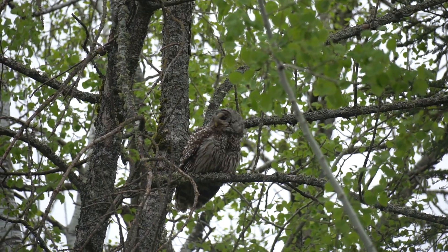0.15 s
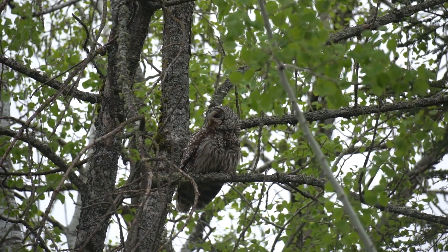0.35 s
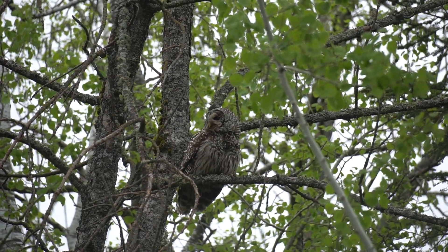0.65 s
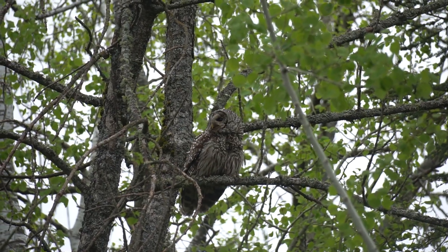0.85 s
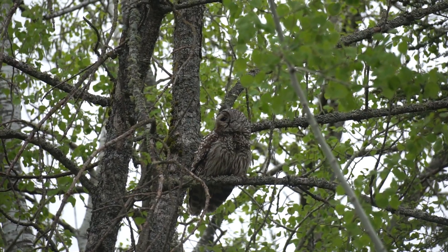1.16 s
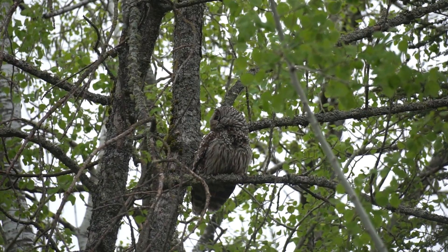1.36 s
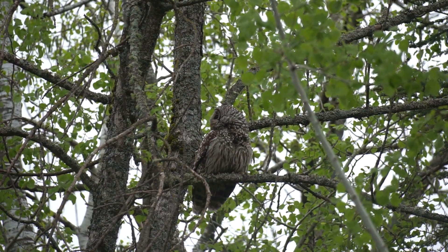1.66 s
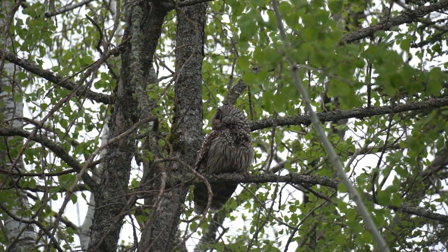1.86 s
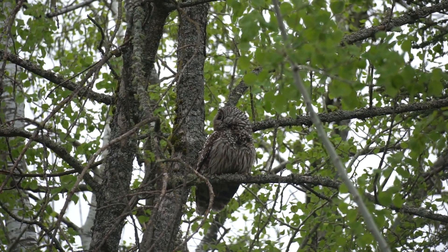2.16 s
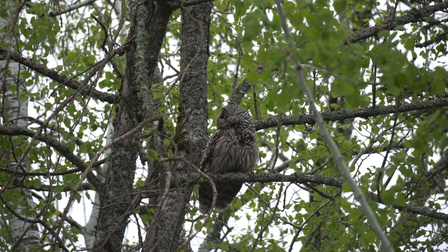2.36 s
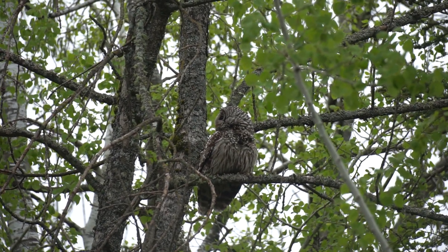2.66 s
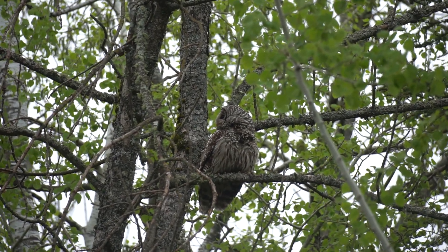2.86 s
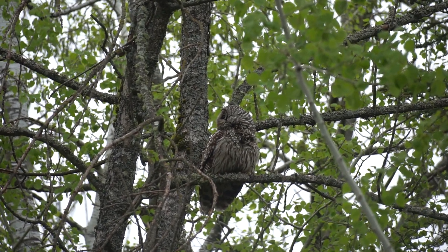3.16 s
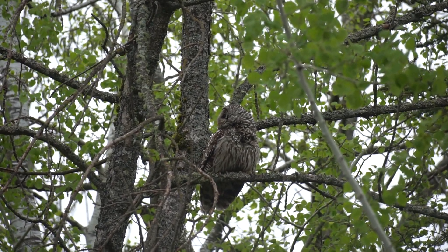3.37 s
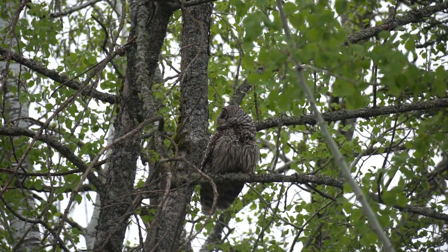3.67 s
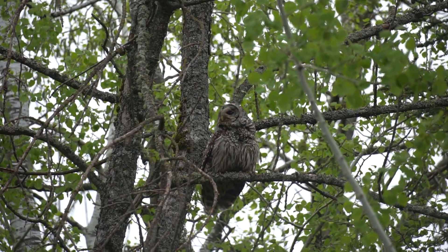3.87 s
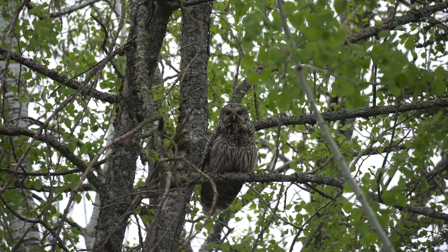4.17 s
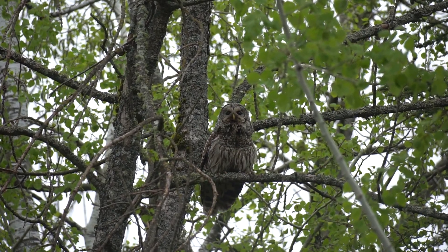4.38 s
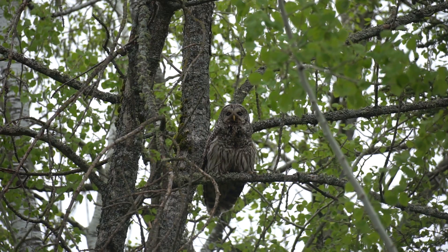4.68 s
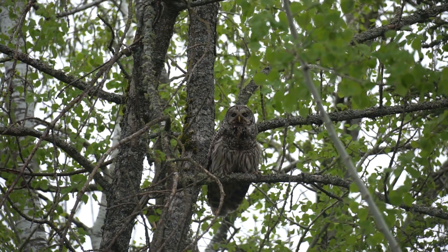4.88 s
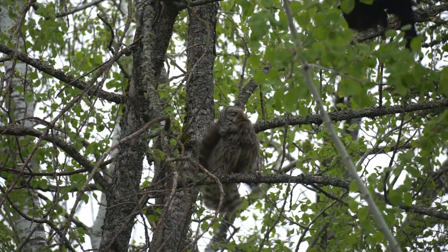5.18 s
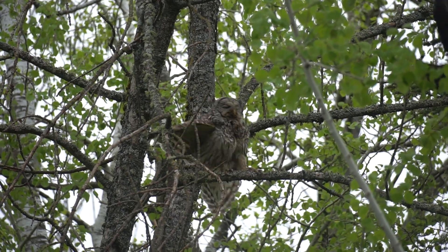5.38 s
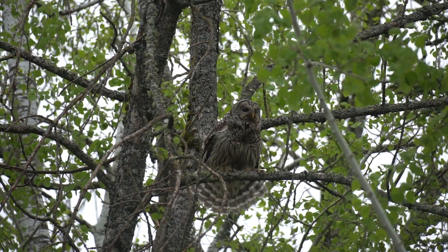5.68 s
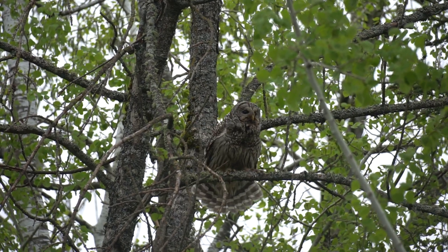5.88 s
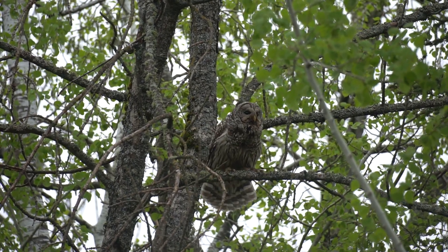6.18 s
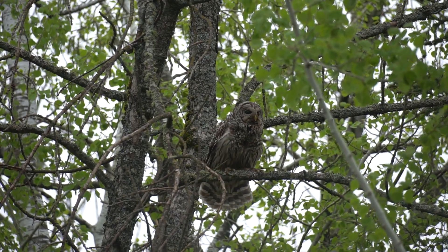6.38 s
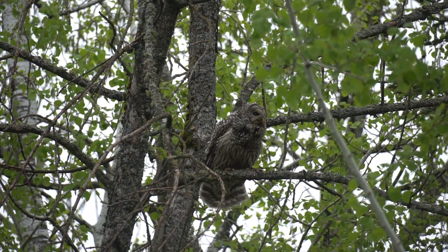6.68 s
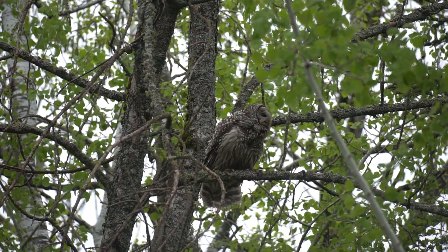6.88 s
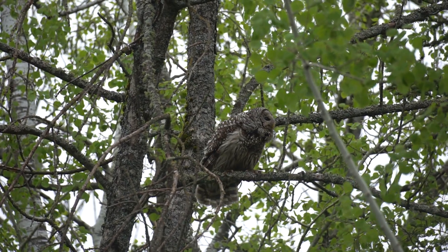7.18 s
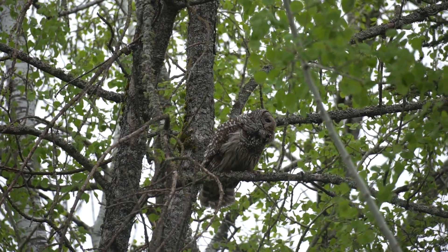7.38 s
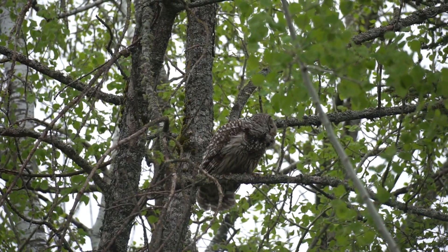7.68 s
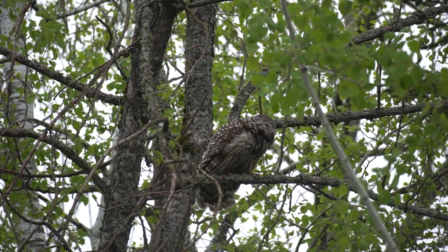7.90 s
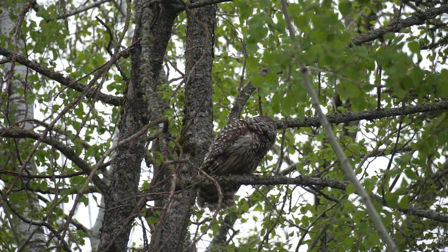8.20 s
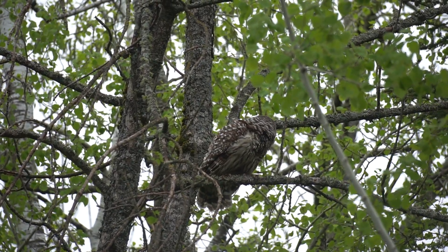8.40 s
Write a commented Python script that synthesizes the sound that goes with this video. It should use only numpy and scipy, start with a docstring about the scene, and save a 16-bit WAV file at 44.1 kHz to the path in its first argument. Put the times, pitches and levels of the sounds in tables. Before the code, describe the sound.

Still woodland air makes a soft, steady rush with a barely audible distant drone. From 0 to 4 s, dry twig ticks, clustered around 0.7-1.2 s, mix with light songbird whistles, quick zigzag warbles and far twitter, busiest at about 1.7-3.9 s and echoing among trunks. At 4.3 s an owl grunts slightly and gives a soft opening hoot. Short, hollow, mid-low hoots follow at about 4.8, 5.0, 5.5, 5.8, 6.2, 6.6 and 7.1 s, each scooping up roughly and dropping away. Feathers and leaves rustle faintly around 5.1-5.9 s. At 7.3 s the owl holds a longer clear note, which breaks at 7.6 s into a gruff, quavering descent ending near 8 s. A hoarse, fluttering crow on the right caws at 7.4, 7.7, 8.1 and 8.4 s. Light woodland echo remains.

```python
"""A wood in still air: a barred owl hoots eight times, then holds a long note that drops gruff and falling.
Owl: harmonic stacks through a throat resonance favouring the hoots' fundamental and low slides' 2nd harmonic.
Crow to the right: four fluttering caws with breath noise. Songbirds further off: swept sines.
Twigs tick and brushes rustle as shaped noise; far tones and a drone are sines; trunks and leaves scatter
all but the air and the rustle as decaying noise echoes."""
import sys
import numpy as np
from scipy import signal
from scipy.fft import rfft, irfft, next_fast_len
from scipy.io import wavfile
from scipy.ndimage import map_coordinates

SR = 44100
rng = np.random.default_rng(int(sys.argv[2]) if len(sys.argv) > 2 else 0)


def to_wav(s):
    """Save 16-bit WAV."""
    ch = np.atleast_2d(s).T  # columns
    pcm = np.round(np.clip(ch, -1, 1) * 32767)  # PCM
    wavfile.write(sys.argv[1], SR, pcm.astype(np.int16))


N = 376613
T = np.arange(N) / SR
TOP_HZ = 11050

# Still air, spectral outline: freq_hz, relative_density_db
AIR_OUTLINE = [(15, -74), (25, -35), (101, -12.5), (169, -9), (381, -6.5), (444, -7), (685, -1),
               (819, -3.5), (1030, -7), (1330, -9.5), (2510, -9.5), (3500, -6.5), (3770, -10), (9930, -16),
               (11000, -18.5), (14300, -71), (22000, -120)]
AIR_DB = -55.5
# Faint far-off drone, before wavering and fade: pitch_hz, level_db
DRONE_TONES = [(97, -76), (120, -74)]

# Faint low tones from far off: start_s, end_s, pitch_hz, level_db
LOW_TONES = [(1.418, 1.51, 400, -58), (1.497, 1.6, 570, -62), (2.36, 2.503, 564, -60.5),
             (3.498, 3.62, 129, -66)]

# Brushes of feathers and leaves as the birds move: loudest_s, level_db, time_per_10_db_s
BRUSH_SWELLS = [(5.08, -59, .08), (5.36, -56.5, 0.4), (5.55, -51.5, .11), (5.82, -52.5, 0.15),
                (6.8, -62.5, 1.5)]

# Twig ticks: start_s, level_db, centre_hz
TWIG_TICKS = [(0.711, -45, 6000), (.782, -44.5, 7000), (0.879, -47, 750), (1.017, -48, 1100),
              (1.126, -43, 1850), (1.187, -39.5, 4500), (2.295, -45.5, 920), (2.329, -43, 1400),
              (3.166, -39.5, 3480), (4.684, -42, 4220), (8.115, -41.5, 7800)]
TICK_CYCLES = 9.7  # to decay by a factor e; low ticks ring longer

# Distant twitter, before mixing: start_s, end_s, first_hz, last_hz, first_db, last_db
TWITTER_SONGS = [(.55, 1.5, 3650, 3487, -58.5, -57.5), (1.68, 3.3, 3800, 3952, -51.5, -48.5),
                 (3.301, 3.799, 4210, 4182, -46, -44), (6.795, 7.302, 4560, 4320, -65.5, -54.5)]
# Higher, thinner trill bursts, before mixing: start_s, level_db
TRILL_BURSTS = [(2.66, -62), (3.04, -59), (3.5, -53.5)]
TRILL_S, TRILL_HZ = 0.1, 6180
SWEEPS_PER_S = 80
SYLLABLES_PER_S, SYLLABLE_DB = 10.98, 2.5
# Near zigzag phrases from the top, before mixing: start_s, length_s, centre_hz, swings, level_db
WARBLE_PHRASES = [(.045, .103, 3000, 1.5, -44), (1.68, .11, 3073, 1.35, -48.5),
                  (3.154, 0.053, 2953, 0.72, -46), (3.352, .075, 2836, .8, -47.5),
                  (4.732, 0.2, 3396, 1.5, -53)]
WARBLE_OCTAVES = .25
DOWNSWING_DB = 2  # falling half of each swing is louder
# Single whistles, before mixing: start_s, length_s, middle_hz, glide_octaves, level_db
SINGLE_WHISTLES = [(0.386, 0.0085, 6940, 0.33, -53.5), (.45, .022, 3480, -.05, -52.5),
                   (.897, 0.05, 3640, -.25, -53.5), (1.809, .032, 3200, .1, -47),
                   (1.786, 0.057, 3140, 0.11, -45), (2.748, 0.077, 4100, -0.14, -52.5),
                   (3.222, .027, 4060, -0.32, -44), (3.228, 0.043, 5230, 0.042, -45.5),
                   (3.266, 0.075, 2436, -0.043, -51), (3.389, 0.13, 4900, .22, -45.5),
                   (3.54, 0.021, 3900, -0.424, -43.5), (3.696, .03, 4190, -0.3, -43),
                   (3.71, .04, 5200, 0.013, -48), (3.875, 0.11, 4670, 0.026, -49.5),
                   (3.884, .1, 4080, -.02, -51.5), (6.872, .04, 4690, -.05, -57.5),
                   (7.079, .037, 4550, -.14, -52.5), (7.18, .04, 4350, .2, -55)]

# Caws: start_s, top_pitch_hz, level_db
CAW_CALLS = [(7.391, 779, -24), (7.728, 777.8, -23.5), (8.06, 770, -25), (8.399, 761.5, -26.5)]
# Course of one caw: share_of_length, pitch_ratio, level_db
CAW_COURSE = [(0, .73, -15.5), (0.131, .84, -9.5), (0.249, 0.96, -1), (0.402, 1, 2), (0.53, 0.98, -0.5),
              (.7, .91, -2.5), (0.867, .84, -8), (1, .76, -4.5)]
# Crow's throat, beak open: freq_hz, gain_db
CROW_THROAT_GAIN = [(600, -15.5), (800, -25), (1150, -7.5), (1400, 1), (1560, -3.5), (1850, -13.5),
                    (2300, -20.5), (3000, -24), (3800, -22.5), (4600, -31), (5500, -26), (6300, -39),
                    (7200, -51), (9500, -58)]
# Hiss through the open beak, outline: freq_hz, relative_level_db
BREATH_OUTLINE = [(1100, -17), (1900, 7.5), (2700, -20), (3700, 4), (4400, -4.5), (5400, -1), (6300, -3.5),
                  (7200, -13), (8800, -17.5), (10500, -30.5)]
CAW_S = .151
CAW_FLUTTER_HZ, CAW_SHIMMER_DB = 68, 1.8  # nominal flutter rate, spread of strength jumps

# Owl's throat, beak shut: freq_hz, gain_db
OWL_THROAT_GAIN = [(280, -15), (430, -11), (530, -2.5), (610, -3), (650, -0.5), (700, -14), (860, -8),
                   (1000, -18), (1250, -19.5), (1420, -34.5), (1700, -26.5), (1980, -24.5), (2600, -26),
                   (3200, -39.5), (3800, -35.5), (4600, -70)]
# Short arched hoots: start_s, end_s, top_hz, drive_db, overtones_db, scoop_before_s, drop_after_s
SHORT_HOOTS = [(4.829, 4.888, 622.6, -20, -3.5, 0.038, 0.039),
               (4.984, 5.104, 661.4, -20.5, -0.5, 0.052, .016),
               (5.496, 5.613, 682.6, -20.5, 0, 0.032, 0.029), (5.798, 5.906, 673.6, -18.5, 1, 0.027, .032),
               (6.184, 6.291, 658.8, -18, 1.5, .036, .032), (6.643, 6.738, 644, -17.5, 1, .044, .044),
               (7.087, 7.184, 643, -18, 1, .047, 0.054)]
# Soft opening hoot: time_s, pitch_hz, level_db
OPENING_COURSE = [(4.374, 533, -39), (4.392, 635, -36.5), (4.456, 603.5, -45), (4.472, 653, -40),
                  (4.514, 684, -32), (4.56, 688.4, -28.5), (4.626, 643, -32), (4.638, 600, -37)]
# Long closing hoot: time_s, pitch_hz, level_db
CLOSING_COURSE = [(7.3, 543, -27.5), (7.328, 622.4, -20), (7.39, 643.4, -20), (7.496, 650, -20),
                  (7.564, 601, -19.5), (7.588, 554, -24.5), (7.63, 534, -24)]
# Pitch ratios at the ends of a short hoot; higher flatness = flatter top, quicker ends
HOOT_FIRST, HOOT_LAST, HOOT_FLATNESS = .82, .81, 3.1
# Low-register slides at usual drive: first_hz, middle_hz, last_hz
SCOOP_HZ = (314.7, 429.2, 488)  # out of silence
SLUR_HZ = (284, 345.3, 438.4)  # lazier, out of the sound before
DROP_HZ = (419.5, 312.8, 267.6)
SLUR_GAP_S = .15  # a hoot this soon after the last is slurred
# Slide level at the reference pitch; more pressure raises pitch and level together
SLIDE_DB, SLIDE_REF_HZ, PUSH_DB_PER_OCTAVE = -26.5, 400, 12.5
SLIDE_EDGE_DB = -2  # fullest in the middle
SLIDE_FULL_S = .028  # shorter slides are weaker
# Harder drive makes slides higher, louder and brighter, with more second harmonic
USUAL_DRIVE_DB, SLIDE_OCTAVES_PER_DB, SLIDE_BRIGHT_PER_DB = -19, 0.0343, 1.2
SLIDE_LEVEL_PER_DB, SLIDE_SECOND_PER_DB = 0.55, .7
# Grunt, then the slurs into the opening and closing hoots; *_DB here is drive
GRUNT_START_S, GRUNT_END_S, GRUNT_DB = 4.295, 4.31, -23
OPENING_SLUR_S, OPENING_SLUR_DB = .06, -24
CLOSING_SLUR_S, CLOSING_SLUR_DB = 0.087, -20
# Pitch slip at the end of a long hoot
SLIP_SHARE, SLIP_S = 0.11, 0.009
# Gruff fall: base pitch and level, sag, fade, quaver
FALL_S, FALL_HZ, FALL_DB = .38, 423.4, -23
SAG_HZ_PER_S, FADE_DB_PER_S = 265, 21
QUAVER_HZ, QUAVER_DEPTH = 16, 0.024
BREAK_HZ, BREAK_S = 66, 0.0083  # starts this much higher, settles this fast
GIVE_OUT_S, GIVE_OUT_HZ, GIVE_OUT_DB = 0.05773, 53, -13  # extra drop over the last moments


def undb(db):
    """Decibels to gain."""
    return 10 ** (np.asarray(db) / 20)


def unit(x):
    """Scale to rms 1."""
    return x / np.sqrt(np.mean(x ** 2))


def response(points, hz):
    """Gain of a (freq_hz, gain_db) outline, falling steeply outside its ends."""
    f, db = np.transpose(points)
    hz = np.maximum(hz, 1)
    skirts = np.minimum(1, np.minimum(hz / f[0], f[-1] / hz)) ** 2
    return undb(np.interp(np.log(hz), np.log(f), db)) * skirts


def colour(x, points):
    """Filter by a (freq_hz, gain_db) outline."""
    n = next_fast_len(x.shape[-1])
    hz = np.arange(n // 2 + 1) * SR / n
    return irfft(rfft(x, n) * response(points, hz), n)[..., :x.shape[-1]]


def wander(t, rate_hz):
    """Smooth chance, spread near 1, through rate_hz random values a second."""
    place = (t - t[0]) * rate_hz
    return map_coordinates(rng.standard_normal(4096), [place], order=2, mode="wrap")


def tone(hz):
    """Sine following a pitch curve."""
    return np.sin(2 * np.pi * np.cumsum(hz) / SR)


def span(start, end, fade_s=.008):
    """Sample times of a note and its soft-edged gate."""
    t = T[max(int((start - fade_s / 2) * SR), 0):int((end + fade_s / 2) * SR)]
    edge = np.clip(np.minimum(t - start, end - t) / fade_s + .5, 0, 1)
    return t, np.sin(np.pi / 2 * edge) ** 2


def arch(t, start, end, first, middle, last, power):
    """Glide through three values; higher power flattens the middle."""
    u = np.clip(2 * (t - start) / (end - start) - 1, -1, 1)
    return middle + (np.where(u < 0, first, last) - middle) * np.abs(u) ** power


def add(out, t, sound):
    """Mix a note in at its time."""
    i = int(round(t[0] * SR))
    out[i:i + len(t)] += sound


def pan(x, left_db):
    """Place a source by its left-minus-right level."""
    return x * undb(np.array([[left_db], [-left_db]]) / 2)


def wood(x, wet_db, t60_s, treble_db, alike_db, build_s, trunk_share):
    """Scatter: diffuse from leaves, separate echoes from trunks; ears differ more in the treble."""
    t = T[:2 * SR]
    leaves = rng.standard_normal((2, len(t)))
    hits = rng.random(len(t)) < 60 / SR  # about 60 a second
    trunks = unit(rng.standard_normal((2, len(t))) * hits)
    decay = undb(-60 * t / t60_s) * (1 - np.exp(-t / build_s))
    mid, side = (leaves + trunk_share * trunks) * decay
    side = colour(side, [(1, -25.5), (500, -alike_db), (2500, -4.0), (20000, 10)])
    ears = np.array([mid + side, mid - side]) / np.sqrt(np.sum(mid ** 2))
    echo = colour(ears, [(1, 23), (1000, -2.5), (5000, treble_db), (11000, 7.0)])
    return undb(wet_db) * signal.fftconvolve(x[None], echo, axes=1)[:, :N]


def air():
    """Steady noise rush, humped near 750 Hz, alike in both ears only in the bass; a drone that fades back."""
    mid, side = (unit(colour(rng.standard_normal(N), AIR_OUTLINE)) for _ in range(2))
    side = colour(side, [(20, -22.5), (120, -15), (250, -5.5), (600, -3.5), (1200, 2), (11000, -2.5)])
    hump_outline = [(450, -14.5), (600, -11), (780, -3.5), (900, -8.5), (1100, -19)]
    hump = unit(colour(rng.standard_normal((3, N)), hump_outline))
    rush = undb(-63.5 + 0.98 * wander(T, 2.5)) * (hump[0] + .8 * hump[1:])  # shared + one per ear
    drone = np.zeros(N)
    for hz, db in DRONE_TONES:
        drone += undb(db + 2 * wander(T, 21)) * tone(hz + 3 * wander(T, 36))
    drone *= undb(np.interp(T, [2.0, 2.3], [3, -4]))
    return undb(AIR_DB) * np.array([mid + side, mid - side]) + rush + drone


def far_tones():
    """Brief low sines from deep in the wood, with strong echo."""
    out = np.zeros(N)
    for start, end, hz, db in LOW_TONES:
        t, gate = span(start, end, fade_s=0.044)
        add(out, t, gate * undb(db) * np.sin(2 * np.pi * hz * t))
    return out + wood(out, wet_db=-8, t60_s=0.61, treble_db=0, alike_db=7.4, build_s=.01, trunk_share=0.57)


def rustle():
    """Broad treble noise in uneven brushes that swell and fade."""
    outline = [(900, -2), (2500, -3.5), (5000, -5.5), (8500, -8.5), (11000, -11.5)]
    brush = colour(rng.standard_normal((2, N)), outline)
    swells_db = [db - 10 * np.abs(T - s) / fade_s for s, db, fade_s in BRUSH_SWELLS]
    return unit(brush) * undb(np.max(swells_db, axis=0) + 4.4 * wander(T, 61))


def twigs():
    """Dry ticks: decaying noise bursts in one broad resonance."""
    out = np.zeros(N)
    for start, db, hz in TWIG_TICKS:
        t = T[int(start * SR):][:SR // 16]
        burst = unit(colour(rng.standard_normal(len(t)), [(hz / 3, -8), (hz, 0), (hz * 2, -7)]))
        add(out, t, undb(db) * burst * np.exp(-(t - t[0]) * hz / TICK_CYCLES))
    out = colour(out, [(400, 0), (20000, 0)])  # ticks carry no bass
    return out + wood(out, wet_db=-5.5, t60_s=0.29, treble_db=-9, alike_db=3.3, build_s=0.0076,
                      trunk_share=0.48)


def whistle(t, hz):
    """Songbird's nearly pure, slightly unsteady tone."""
    return tone(hz * (1 + .012 * wander(t, 400)))


def chatter(start, end, first_hz, last_hz, first_db, last_db, spread):
    """Brief up and down sweeps scattered round a centre pitch, their levels grouped into syllables."""
    out = np.zeros(N)
    count = int((end - start) * SWEEPS_PER_S) + 2
    starts = np.linspace(start, end, count)
    centres_hz = np.linspace(first_hz, last_hz, count)
    levels_db = np.linspace(first_db, last_db, count) + SYLLABLE_DB * wander(starts, SYLLABLES_PER_S)
    chances = rng.uniform(-1, 1, (count, 2))
    for at, centre_hz, db, (high, direction) in zip(starts, centres_hz, levels_db, chances):
        t, gate = span(at, at + .03, fade_s=.015)
        sweep = .7 * np.sign(direction) * np.linspace(-1, 1, len(t))
        hz = centre_hz * np.exp(spread * (high + sweep))
        add(out, t, gate * undb(db) * tone(hz))
    return out


def songbirds():
    """Near warbles and whistles plus further twitter and trills, heard mostly through the trees."""
    near, far = np.zeros(N), np.zeros(N)
    for start, length, centre_hz, swings, db in WARBLE_PHRASES:
        t, gate = span(start, start + length)
        swing = 2 * np.pi * swings * (t - start) / length
        hz = centre_hz * 2 ** (WARBLE_OCTAVES * np.cos(swing))
        add(near, t, gate * undb(db + DOWNSWING_DB * np.sin(swing)) * whistle(t, hz))
    for start, length, middle_hz, glide_octaves, db in SINGLE_WHISTLES:
        t, gate = span(start, start + length)
        hz = middle_hz * 2 ** (glide_octaves * ((t - start) / length - .5))
        add(near, t, gate * undb(db) * whistle(t, hz))
    for song in TWITTER_SONGS:
        far += chatter(*song, spread=0.23)
    for start, db in TRILL_BURSTS:
        far += chatter(start, start + TRILL_S, TRILL_HZ, TRILL_HZ, db, db, spread=.1)
    direct = pan(.8 * near + .3 * far, 3.5)
    return direct + wood(1.43 * near + far, wet_db=-4, t60_s=1.0, treble_db=-0.5, alike_db=3,
                         build_s=0.0026, trunk_share=0.73)


def syrinx(t, hz, throat, jitter, rasp_db, bright_db=0, even_db=0):
    """Wavering harmonic stack plus air noise gated once a cycle, both shaped by the throat."""
    hz = hz * (1 + jitter * wander(t, 297.7))
    phase = 2 * np.pi * np.cumsum(hz) / SR
    k = np.arange(1, 15)[:, None]
    # effort brightens the overtones; a symmetric swing of the membranes weakens the even ones
    effort_db = bright_db * np.clip(k * hz / 1000 - 1, 0, 1)
    symmetry_db = even_db * (k % 2 == 0) * 2 / k
    gains = response(throat, k * hz) * undb(effort_db + symmetry_db)
    stack = np.sqrt(2) * np.sum(gains * np.sin(k * phase), axis=0)
    gated_air = unit(colour(rng.standard_normal(len(t)) * (1 + np.cos(phase)), throat))
    return stack + undb(rasp_db) * gated_air


def crow():
    """Caws arch in pitch, flutter in pitch and strength, and grow hoarse as they fall."""
    out = np.zeros(N)
    share, ratio, shape_db = np.transpose(CAW_COURSE)
    for start, top_hz, db in CAW_CALLS:
        t, gate = span(start, start + CAW_S)
        u = (t - start) / CAW_S
        flutter = np.sin(2 * np.pi * CAW_FLUTTER_HZ * (t - start) + 0.79 * wander(t, 40.0))
        hz = top_hz * np.interp(u, share, ratio) * (1 + .014 * flutter + .009 * wander(t, 900))
        # the beak is wide at the start, so the overtones lead
        bright_db = np.interp(u, [0, .3, 1], [7, .5, -2])
        voice = syrinx(t, hz, CROW_THROAT_GAIN, jitter=.011 + .026 * u ** 2, rasp_db=-30.0 + 13.4 * u,
                       bright_db=bright_db)
        voice *= undb(np.interp(u, share, shape_db))
        breath_db = np.interp(u, [0, .4, .8, 1], [-37, -23.5, -22.5, -17.0])
        hiss = rng.standard_normal(len(t)) * (1 + 0.2 * flutter)
        breath = unit(colour(hiss, BREATH_OUTLINE)) * undb(breath_db)
        rough_db = 1.6 * flutter + CAW_SHIMMER_DB * wander(t, 220)
        add(out, t, gate * undb(db + rough_db) * (voice + breath))
    direct = pan(out, -13)
    direct[0] = np.roll(direct[0], 2)  # left ear two samples later
    return direct + wood(out, wet_db=-0.5, t60_s=0.96, treble_db=0.5, alike_db=3, build_s=0.017,
                         trunk_share=0.63)


def slide(start, end, course_hz, drive_db):
    """Rough glide in the owl's low register, louder as it rises."""
    t, gate = span(start, end)
    effort_db = drive_db - USUAL_DRIVE_DB
    hz = arch(t, start, end, *course_hz, 1.16) * 2 ** (SLIDE_OCTAVES_PER_DB * effort_db)
    swell_db = arch(t, start, end, SLIDE_EDGE_DB, 0, SLIDE_EDGE_DB, 1.3)
    push_db = PUSH_DB_PER_OCTAVE * np.log2(hz / SLIDE_REF_HZ)
    db = SLIDE_DB + SLIDE_LEVEL_PER_DB * effort_db + push_db + swell_db
    voice = syrinx(t, hz, OWL_THROAT_GAIN, jitter=.012, rasp_db=-18,
                   bright_db=-5.0 + SLIDE_BRIGHT_PER_DB * effort_db,
                   even_db=0.7 + SLIDE_SECOND_PER_DB * effort_db)
    fullness = min((end - start) / SLIDE_FULL_S, 1) ** 2
    return t, gate * undb(db) * fullness * voice


def hoot(start, end, top_hz, drive_db, overtones_db):
    """Clean arch in the upper register, brightest near its top."""
    t, gate = span(start, end, fade_s=.022)
    hz = arch(t, start, end, HOOT_FIRST * top_hz, top_hz, HOOT_LAST * top_hz, HOOT_FLATNESS)
    bright_db = overtones_db + arch(t, start, end, -9, -1, -15, 2.7)
    voice = syrinx(t, hz, OWL_THROAT_GAIN, jitter=.002, rasp_db=-36, bright_db=bright_db, even_db=-12)
    return t, gate * undb(drive_db) * voice


def long_hoot(course, bright_db):
    """Clean note on a pitch and level curve, throat gain at that pitch divided out; slips down at its end."""
    s, pitch_hz, db = np.transpose(course)
    t, gate = span(s[0], s[-1])
    hz = np.interp(t, s, pitch_hz)
    slip = 1 - SLIP_SHARE * np.exp(np.minimum(t - s[-1], 0) / SLIP_S)
    voice = syrinx(t, hz * slip, OWL_THROAT_GAIN, jitter=.002, rasp_db=-38, bright_db=bright_db, even_db=-12)
    return t, gate * undb(np.interp(t, s, db)) * voice / response(OWL_THROAT_GAIN, hz)


def fall(start):
    """Voice breaks into the low register and sinks with a quaver until it gives out."""
    t, gate = span(start, start + FALL_S)
    age = np.maximum(t - start, 0)
    spent = np.clip(1 - (FALL_S - age) / GIVE_OUT_S, 0, 1)
    breaking = np.exp(-age / BREAK_S)
    hz = FALL_HZ + BREAK_HZ * breaking - SAG_HZ_PER_S * age - GIVE_OUT_HZ * spent
    hz = hz * (1 - QUAVER_DEPTH * np.sin(2 * np.pi * QUAVER_HZ * age))
    db = FALL_DB - FADE_DB_PER_S * age + GIVE_OUT_DB * spent - 7 * breaking
    voice = syrinx(t, hz, OWL_THROAT_GAIN, jitter=.006, rasp_db=-22, bright_db=-1.5)
    return t, gate * undb(db) * voice


def owl():
    """Hoots rise from the rough low register, ring clean and, after the soft opening one, drop back into it."""
    out = np.zeros(N)
    opening_s, last_end = OPENING_COURSE[0][0], OPENING_COURSE[-1][0]
    closing_s, fall_s = CLOSING_COURSE[0][0], CLOSING_COURSE[-1][0]
    add(out, *slide(GRUNT_START_S, GRUNT_END_S, DROP_HZ, GRUNT_DB))
    add(out, *slide(opening_s - OPENING_SLUR_S, opening_s, SLUR_HZ, OPENING_SLUR_DB))
    add(out, *long_hoot(OPENING_COURSE, bright_db=-9))
    for start, end, top_hz, drive_db, overtones_db, scoop_s, drop_s in SHORT_HOOTS:
        rise_hz = SLUR_HZ if start - last_end < SLUR_GAP_S else SCOOP_HZ
        add(out, *slide(start - scoop_s, start, rise_hz, drive_db))
        add(out, *hoot(start, end, top_hz, drive_db, overtones_db))
        add(out, *slide(end, end + drop_s, DROP_HZ, drive_db))
        last_end = end
    add(out, *slide(closing_s - CLOSING_SLUR_S, closing_s, SLUR_HZ, CLOSING_SLUR_DB))
    add(out, *long_hoot(CLOSING_COURSE, bright_db=-1.5))
    add(out, *fall(fall_s))
    return pan(out, -1.6) + wood(out, wet_db=-14.5, t60_s=1.18, treble_db=-8.5, alike_db=12,
                                 build_s=0.024, trunk_share=0.27)


def scene():
    """Everything heard under the trees, background first."""
    return air() + far_tones() + rustle() + twigs() + songbirds() + crow() + owl()


def record(dry):
    """Steep elliptic low-pass at TOP_HZ."""
    return signal.sosfilt(signal.ellip(12, .1, 80, TOP_HZ, fs=SR, output="sos"), dry)


dry = scene()
out = record(dry)
to_wav(out)
```